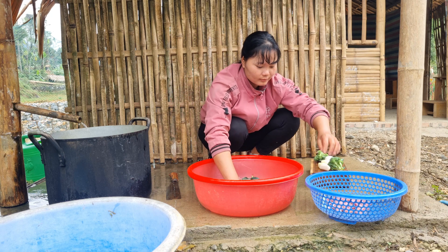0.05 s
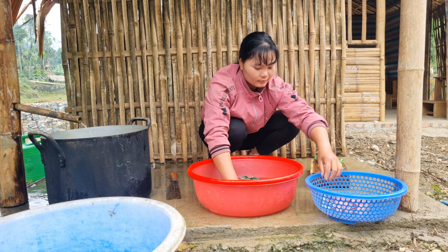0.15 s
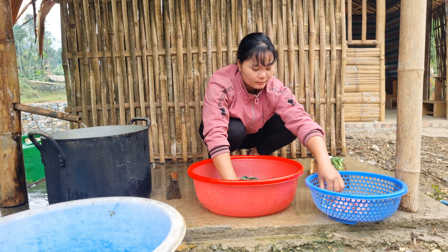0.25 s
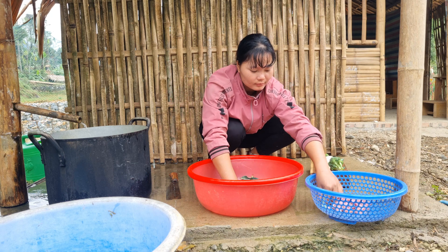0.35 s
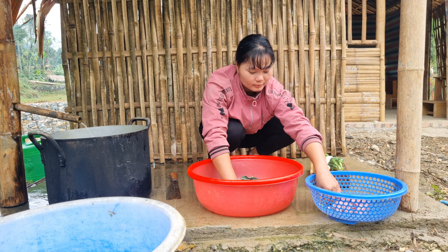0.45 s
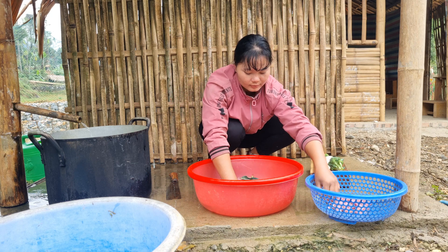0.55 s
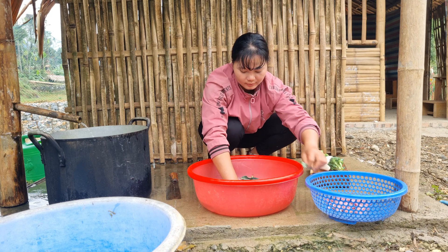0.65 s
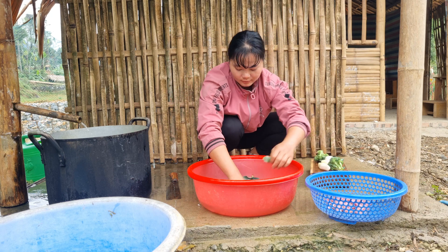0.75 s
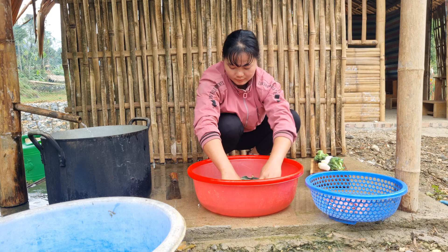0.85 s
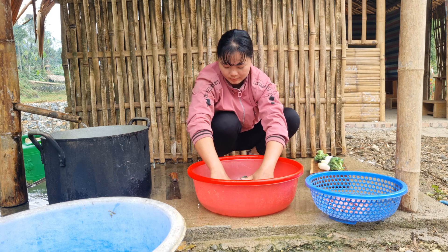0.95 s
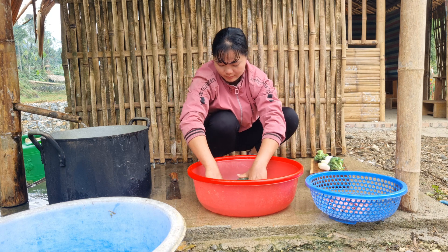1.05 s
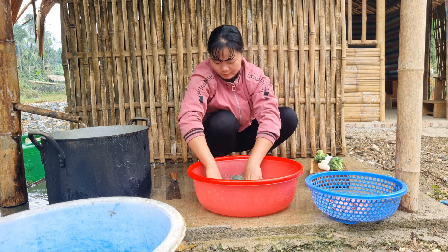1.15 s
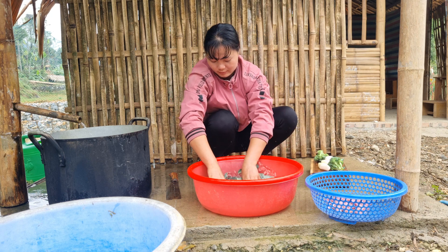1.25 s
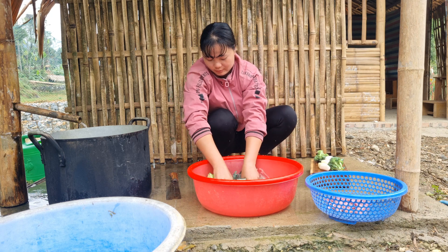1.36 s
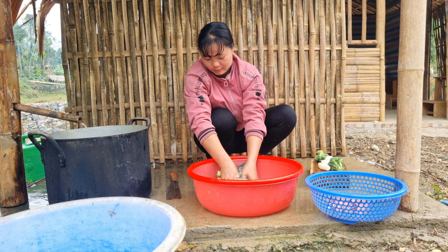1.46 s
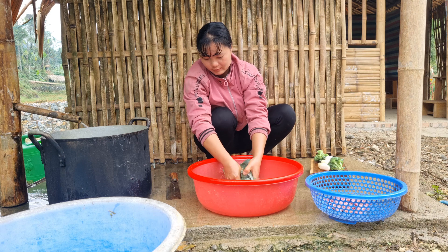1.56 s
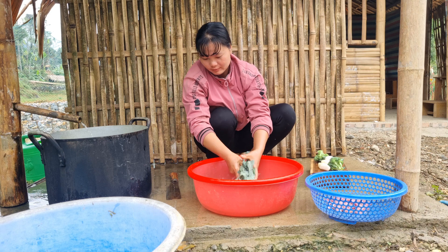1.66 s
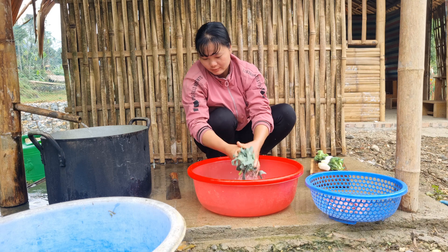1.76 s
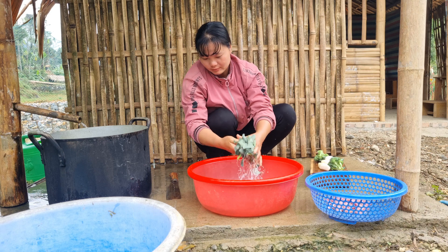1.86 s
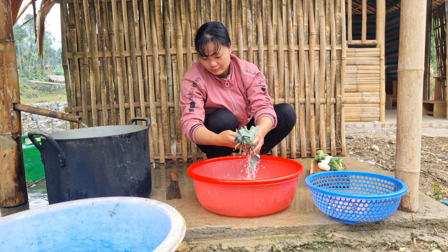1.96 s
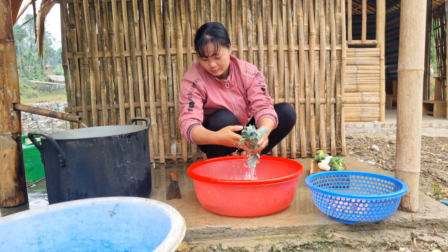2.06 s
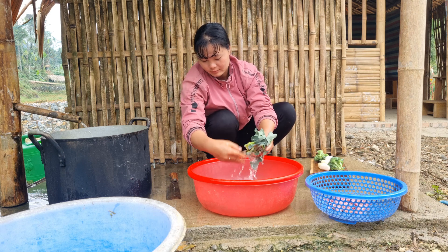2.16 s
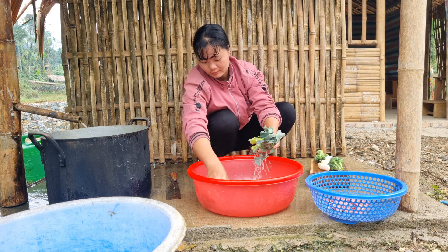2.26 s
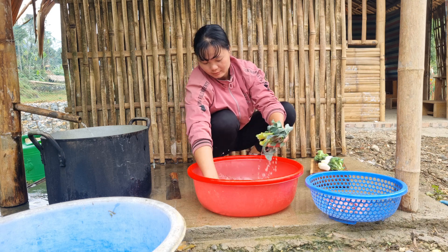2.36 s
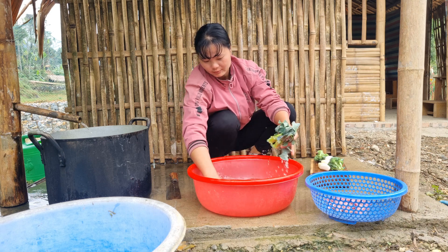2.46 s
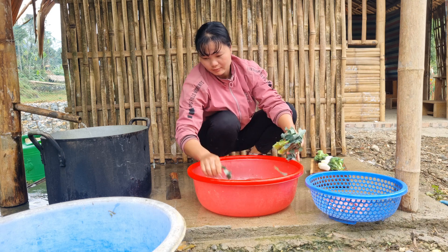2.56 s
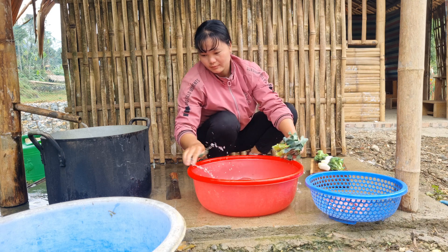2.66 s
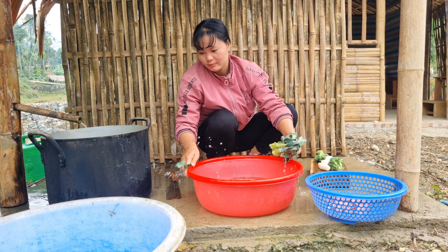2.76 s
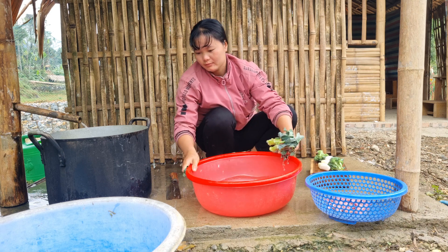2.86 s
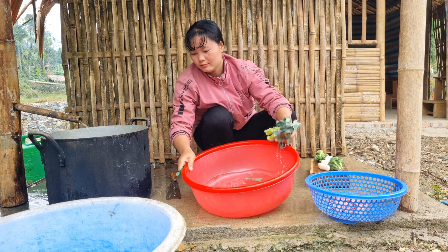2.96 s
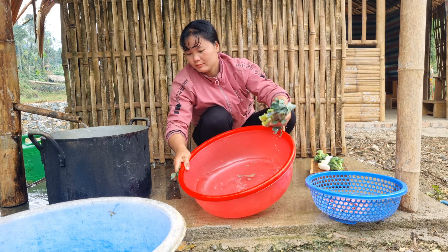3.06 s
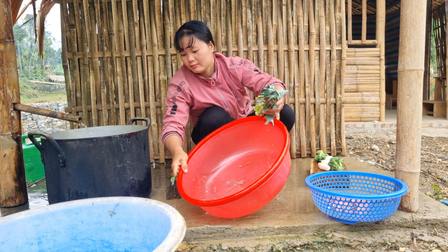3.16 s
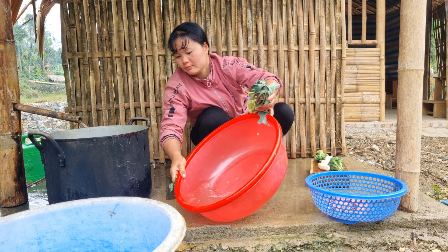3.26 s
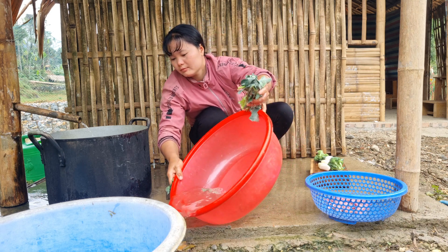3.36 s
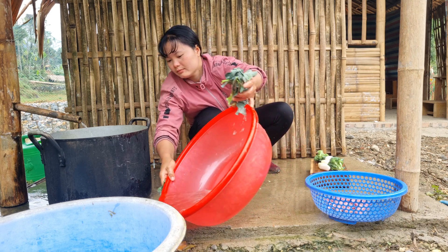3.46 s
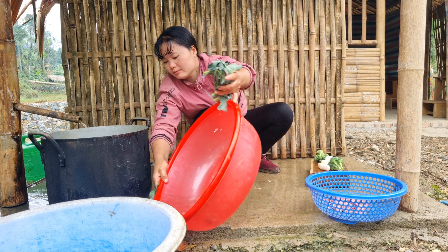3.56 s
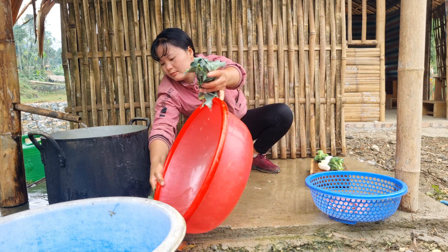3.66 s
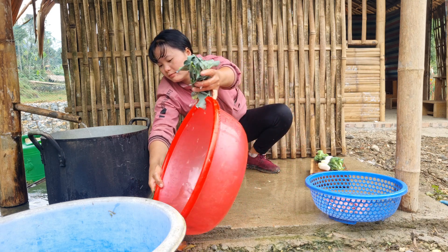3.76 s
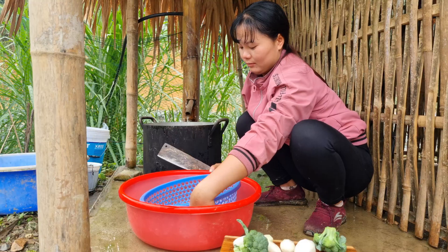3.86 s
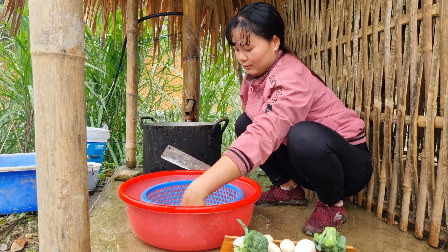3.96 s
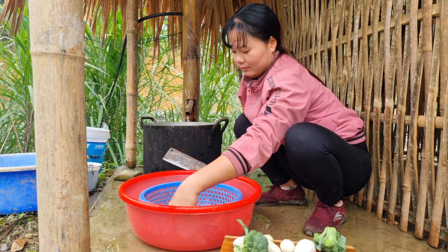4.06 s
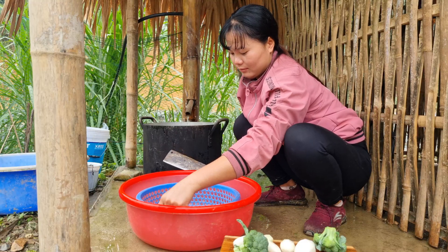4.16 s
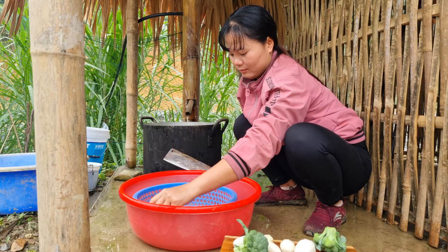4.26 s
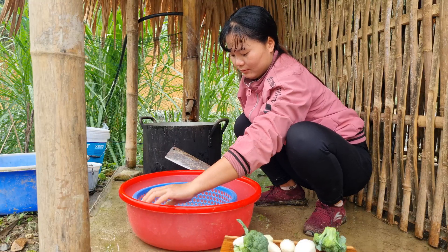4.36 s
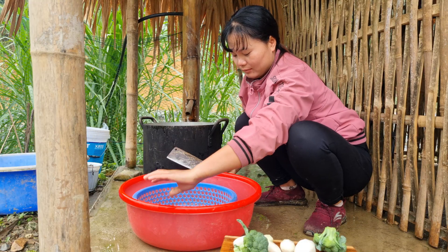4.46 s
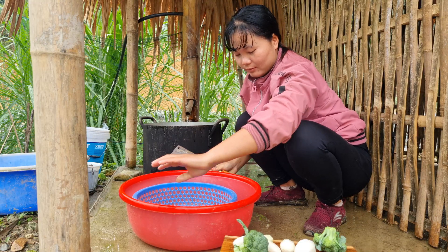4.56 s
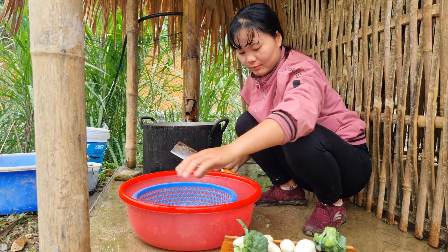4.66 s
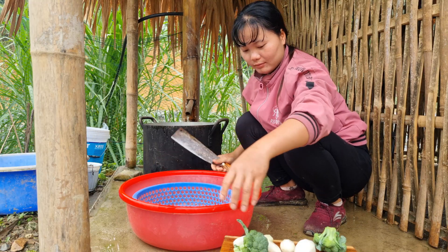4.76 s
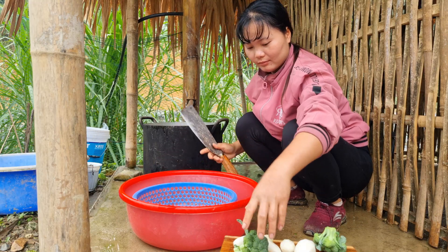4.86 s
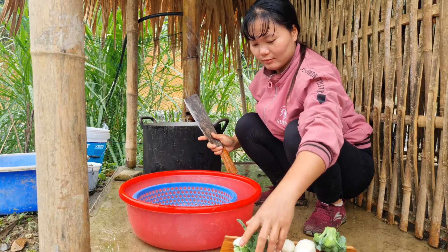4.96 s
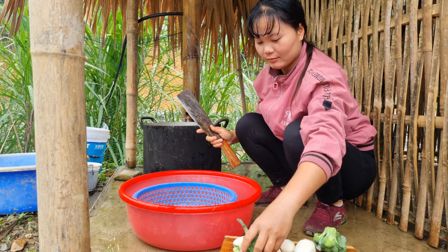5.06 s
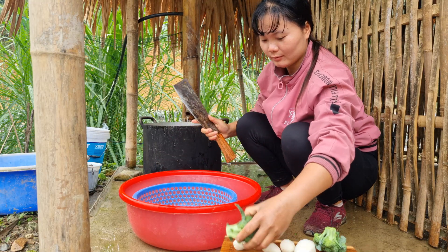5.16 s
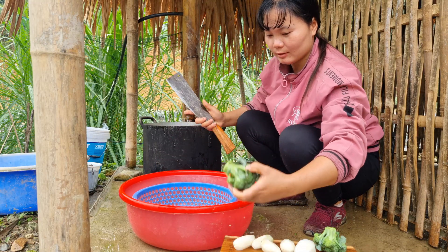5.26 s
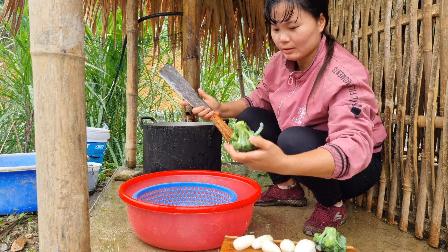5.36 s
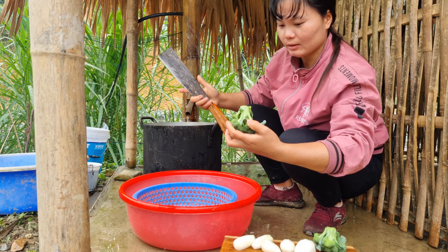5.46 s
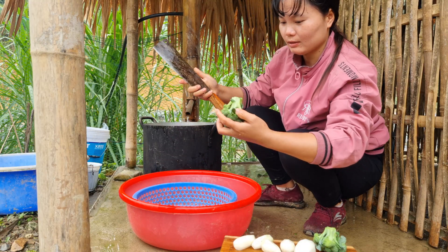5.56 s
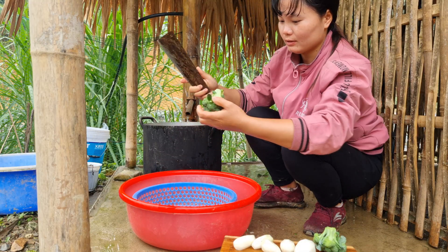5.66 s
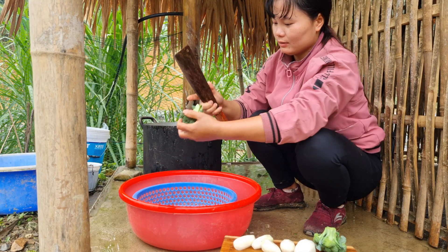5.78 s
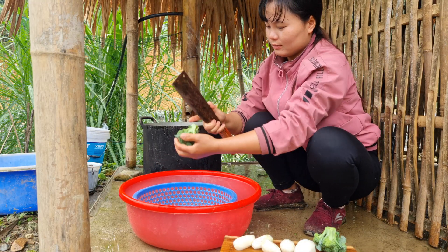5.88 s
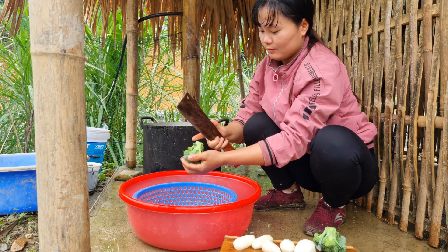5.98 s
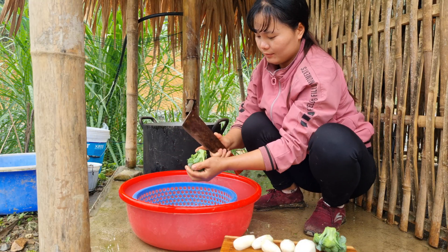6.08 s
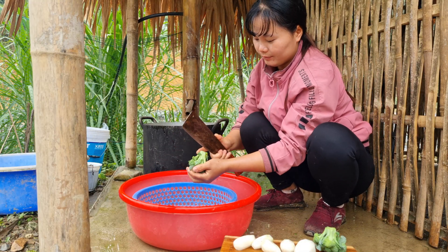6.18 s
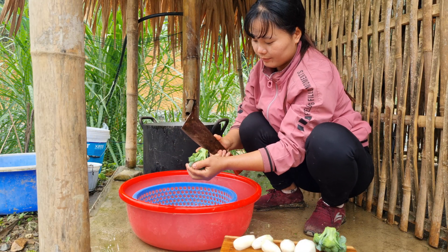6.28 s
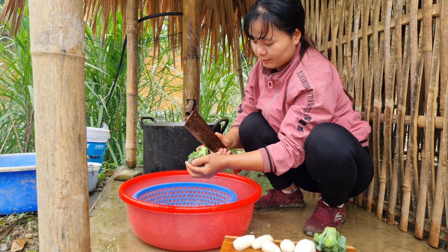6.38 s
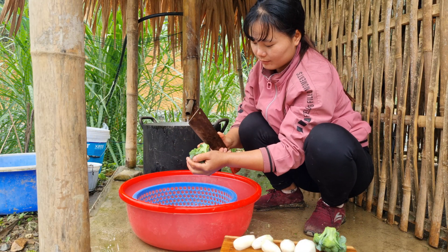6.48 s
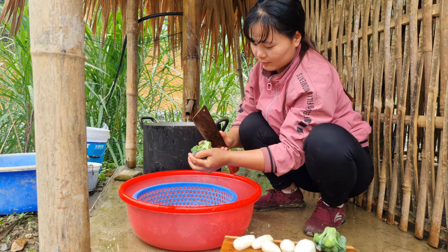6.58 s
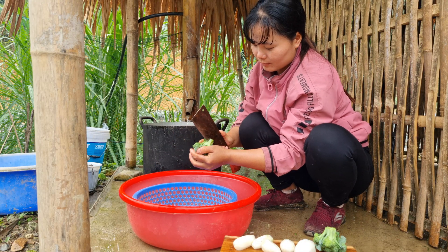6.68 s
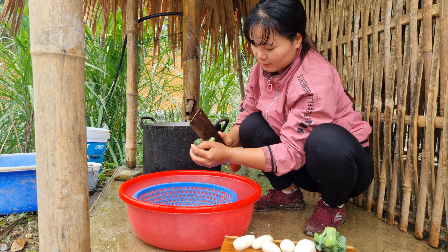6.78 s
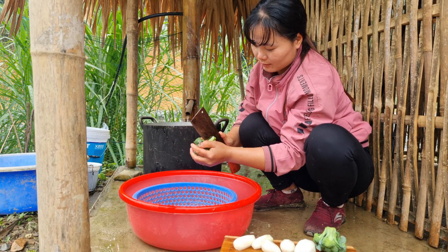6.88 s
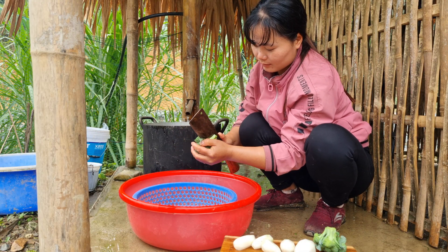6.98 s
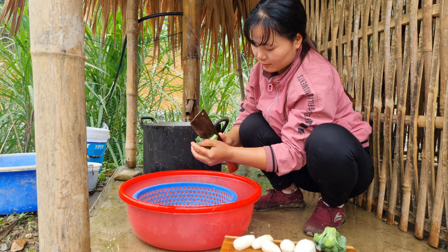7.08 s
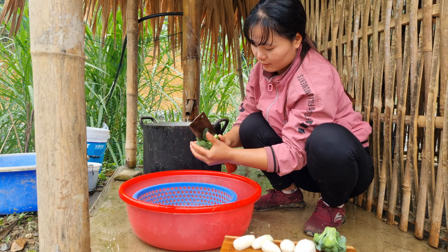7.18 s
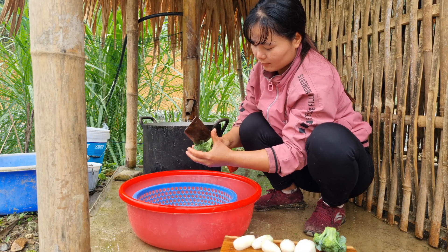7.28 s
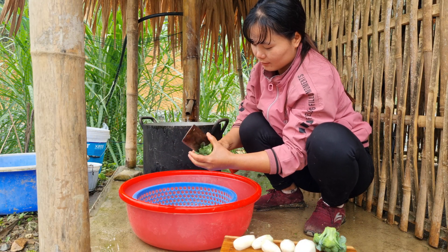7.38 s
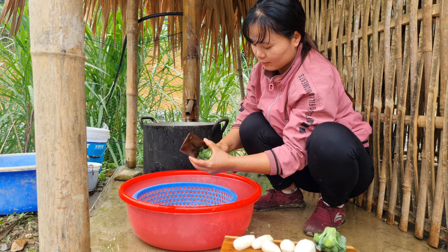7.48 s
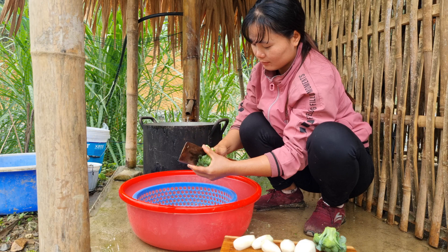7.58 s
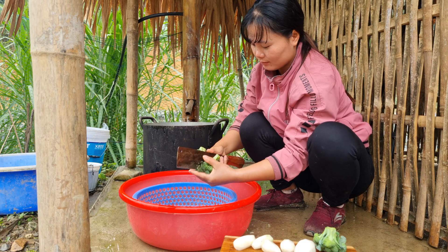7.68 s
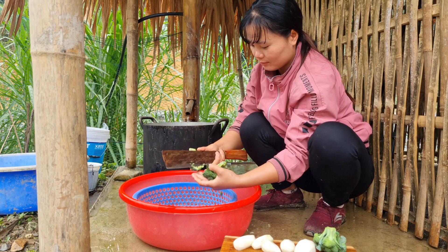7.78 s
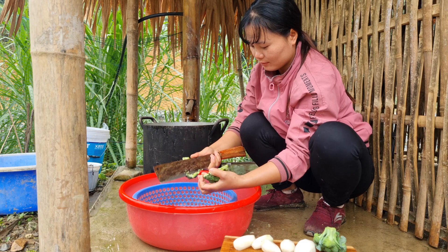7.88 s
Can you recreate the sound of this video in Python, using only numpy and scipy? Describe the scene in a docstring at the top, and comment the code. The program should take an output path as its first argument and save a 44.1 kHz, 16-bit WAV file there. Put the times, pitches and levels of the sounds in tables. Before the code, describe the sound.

Outdoors in a farmyard, close stereo microphone. Hands stir vegetables in a plastic basin with soft bubbles, drips and splashes that grow as greens are lifted. Chicks peep thinly. The basin is tipped: a rushing pour and a very loud hollow knock. Then the water stops; dry leaf and blade strokes, small snaps and a sharp plastic knock sound over a low distant engine hum and thin trickle.

```python
"""Hands wash vegetables in a plastic basin in a farmyard: coloured noise and crowds of bubbles slosh and pour.
Single bubbles, drips and ticks ring short bursts; blows on the basin ring its damped modes.
After the water, noise strokes of leaves and a blade rustle over a basket while distant engine orders hum.
A thin trickle rings a hollow pipe throughout, chicks peep gliding tones and a hen murmurs noisily."""
import sys
import numpy as np
from scipy import signal
from scipy.fft import rfft, irfft, next_fast_len
from scipy.io import wavfile
from scipy.ndimage import uniform_filter1d, map_coordinates

SR = 44100
rng = np.random.default_rng(int(sys.argv[2]) if len(sys.argv) > 2 else 0)


def convert_level_to_amplitude(level_db):
    """Map a level in decibels to its linear amplitude factor."""
    exponent = np.asarray(level_db, float) / 20
    return 10 ** exponent


def unload_audio(sound):
    """Save the sound as a 16-bit wav file, at the path given as the first command line argument."""
    columns = np.transpose(np.atleast_2d(sound))
    # keep every value between -1 and 1, then stretch to whole-number steps
    steps = np.round(np.clip(columns, -1, 1) * 32767)
    wavfile.write(sys.argv[1], SR, steps.astype(np.int16))


N = 349713
TIME = np.arange(N) / SR
RUSTLE_S = 4.3  # water stops, trimming starts

# distant engine: [t/s, cycle rate/Hz, level/dB]
ENGINE_COURSE = [(4.05, 31.97, -48), (4.64, 32.47, -47), (4.82, 32.33, -47), (5.01, 32.8, -46.5),
                 (5.31, 32.46, -48), (6.1, 32.38, -47), (6.59, 32.96, -48.5), (7.29, 32.56, -47.5),
                 (7.93, 33.1, -49.5)]


def unit(x):
    """Scale to rms 1."""
    return x / np.sqrt(np.mean(x ** 2) + 1e-20)


def along(points, hz):
    """Interpolate (Hz, value) points on a log frequency axis."""
    f, v = np.transpose(points)
    return np.interp(np.log(hz + 1), np.log(f + 1), v)


def curves(rows):
    """One value per sample for each column after the time."""
    s, *cols = np.transpose(rows)
    return [np.interp(TIME, s, c) for c in cols]


def wobble(rate_hz):
    """Smooth random curve with rate_hz knots per second."""
    knots = rng.standard_normal(int(N * rate_hz / SR) + 4)
    return map_coordinates(knots, [TIME * rate_hz])


def filtered(x, response):
    """Multiply the spectrum of x by a complex response of frequency."""
    m = next_fast_len(N + SR // 2)
    return irfft(rfft(x, m) * response(np.fft.rfftfreq(m, 1 / SR)), m)[..., :N]


def resonance(f, hz, width_hz):
    """Causal second-order band-pass, peak gain 1."""
    return 1j * f * width_hz / (hz * hz - f * f + 1j * f * width_hz)


def panned(x, db):
    """Mono to stereo, left louder than right by db."""
    return np.array([x * convert_level_to_amplitude(db / 2), x * convert_level_to_amplitude(-db / 2)])


def rush(spectrum, source):
    """Colour two noises and mix them to a frequency-dependent left-right likeness, rms 1."""
    # [f/Hz, likeness]
    likeness = [(60, 0.95), (300, 0.41), (1000, 0.046), (3000, 0.087), (15000, 0.015)]

    def response(hz):
        angle = np.arccos(np.clip(along(likeness, hz), -1, 1)) / 2
        return convert_level_to_amplitude(along(spectrum, hz)) * [np.cos(angle), np.sin(angle)]

    mid, side = filtered(source, response)
    return unit(np.array([mid + side, mid - side]))


def patchy(depth_db):
    """Two noises whose level varies alike in small patches of time and frequency."""
    z = signal.stft(rng.standard_normal((2, N)), nperseg=256)[2]
    field = uniform_filter1d(rng.standard_normal(z.shape[1:]), size=7, axis=0)
    field = uniform_filter1d(field, size=5, axis=1)
    return signal.istft(z * convert_level_to_amplitude(depth_db * unit(field)), nperseg=256)[1][:, :N]


def add(track, s, sound):
    """Mix a short sound in at s seconds."""
    spot = track[..., round(s * SR):][..., :sound.shape[-1]]
    spot += sound[..., :spot.shape[-1]]


def swells(times, hold, db, rise, fade):
    """Amplitude of power-summed humps: 20 dB up in |rise| s, hold, 20 dB down in |fade| s."""
    grid = TIME[::32]
    power = 0
    for s, stay, level, up, down in np.broadcast(times, hold, db, rise, fade):
        before = (s - grid) / abs(up)
        after = (grid - s - stay) / abs(down)
        below = np.maximum(np.maximum(before, after), 0)
        power = power + convert_level_to_amplitude(2 * (level - 20 * below))
    return np.interp(TIME, grid, np.sqrt(power))


def arch(s, length, hz, db, edge_db, glide_hz=0, sag=0):
    """Call on a bowed, gliding pitch; its ends are edge_db softer than its middle."""
    u = np.linspace(-1, 1, 9)
    pitch = hz * (1 - sag * u ** 2) + glide_hz * u / 2
    return np.transpose([s + length * (u + 1) / 2, pitch, db - edge_db * u ** 2])


def gated(call):
    """Phase and amplitude of one call, with 2.8 ms edges."""
    hz, db = curves(call)
    gate = np.clip(np.minimum(TIME - call[0][0], call[-1][0] - TIME) / 0.0028, 0, 1)
    return 2 * np.pi * np.cumsum(hz) / SR, convert_level_to_amplitude(db) * gate


def yard(x):
    """Walls and ground answer: a noise tail in which each frequency dies at its own speed."""
    # [f/Hz, t60/s]
    decay = [(200, 0.18), (2000, 0.15), (10000, 0.17)]
    hz, t, z = signal.stft(rng.standard_normal((2, SR // 2)), SR, nperseg=256)
    tail = signal.istft(z * convert_level_to_amplitude(-60 * t / along(decay, hz)[:, None]), SR, nperseg=256)[1]
    tail = tail / np.linalg.norm(tail[0])
    return signal.fftconvolve(np.pad(x, (200, 0))[None], tail, axes=1)[:, :N]


def air():
    """Air of the yard: steady coloured noise, patchy and slightly unsteady."""
    # [f/Hz, relative density/dB]
    spectrum = [(88, -8), (150, -28), (406, -4.5), (649, 4), (821, -3.5), (1240, 4), (1530, -1), (1940, -4),
                (3350, -5.5), (7620, -2.5), (8900, -17), (14800, -8), (16000, -17)]
    return convert_level_to_amplitude(-63 + 1.6 * wobble(8.4)) * rush(spectrum, patchy(4.5))


def rumble():
    """Low far-off noise throbbing near 36 Hz, and the boom of the lifted basin; ends as the engine enters."""
    # [t/s, level/dB]
    course = [(0, -64.5), (.84, -71), (1.15, -69), (1.2, -60.5), (1.75, -59), (2.08, -69), (2.45, -57),
              (2.55, -67), (2.8, -60), (2.83, -58), (3.014, -47), (3.13, -61), (3.17, -69), (3.3, -74),
              (3.33, -55.5), (3.878, -48), (4.05, -49)]
    # [f/Hz, relative density/dB]
    spectrum = [(12, -50), (20, -19), (102, 3.5), (124, -5.5), (140, -44), (166, -8.5), (242, -15),
                (300, -18), (390, -27), (660, -120)]
    db, = curves(course)
    throb_db = 2.4 * np.sin(2 * np.pi * 36.0 * TIME + 2.0 * wobble(6.0))
    noise = rush(spectrum, rng.standard_normal((2, N)))
    return (TIME < ENGINE_COURSE[0][0]) * convert_level_to_amplitude(db + throb_db) * noise


def engine():
    """Low orders of a steady motor, each slightly unsteady, over resonant low noise."""
    # [multiple of cycle rate, relative level/dB]
    orders = [(1, -10), (2, 5.5), (3, -3.5), (4, 3.5), (5, -1), (6, -21.5), (8, -26.5)]
    hz, db = curves(ENGINE_COURSE)
    phase = 2 * np.pi * np.cumsum(hz) / SR
    tones = 0
    for k, level_db in orders:
        gain = convert_level_to_amplitude(level_db + 0.69 * wobble(2.52))
        tones = tones + gain * np.sin(k * phase + 0.61 * wobble(12.0) + 0.4 * k)
    noise = filtered(rng.standard_normal(N), lambda f: resonance(f, 99, 106) ** 2)
    return (TIME > ENGINE_COURSE[0][0]) * convert_level_to_amplitude(db) * (unit(tones) + 0.29 * unit(noise))


def whine():
    """Thin far tone with a wavering phase."""
    # [t/s, f/Hz, level/dB]
    course = [(7.5, 1497, -58), (7.6, 1506, -71), (7.93, 1506, -69)]
    phase, level = gated(course)
    return level * np.sin(phase + 1.1 * wobble(40))


def trickle():
    """Irregular drops excite the air column of the pipe in short broken rings."""
    # [t/s, level/dB]
    course = [(0, -72.5), (2.5, -64), (3.1, -70), (4.3, -74.5), (5.3, -69), (6.1, -66.5), (6.4, -60.5),
              (6.5, -67), (6.7, -65), (7.93, -67.5)]
    # air resonances: [f/Hz, width/Hz, level/dB]
    pipe = [(671, 66, -3.3), (1160, 57, -3.6), (1920, 47, -2)]
    drips_per_s = 110
    db, = curves(course)
    hit = rng.random(N) < drips_per_s / SR
    rings = 0
    for hz, width_hz, level_db in pipe:
        push = (hit * convert_level_to_amplitude(3 * wobble(30)) + .018) * rng.standard_normal(N)
        ring = filtered(push, lambda f: resonance(f, hz, width_hz) * resonance(f, hz, 3.1 * width_hz))
        rings = rings + convert_level_to_amplitude(level_db) * unit(ring)
    return convert_level_to_amplitude(db) * rings


def birds():
    """Chicks whistle breathy glides; the hen's noisy voice rings a throat resonance and a weaker one below."""
    # chicks: [t/s, length/s, middle f/Hz, glide/Hz, share by which the ends sag, level/dB]
    peeps = [(2.256, 0.1, 7300, 500.5, .04, -53), (2.466, .09, 6900, -150, 0.027, -47.5),
             (2.608, 0.1, 6430, 1502, .085, -51.5), (2.819, 0.047, 7000, -100, 0.016, -48),
             (2.86, 0.08, 6500, -500, 0.0045, -56), (3.048, 0.1, 4600, -1150, .005, -53),
             (3.203, 0.051, 4950, -200, 0.0046, -51), (4.848, 0.08, 3960, -200, .02, -53),
             (6.249, 0.067, 4200, -300, .02, -56), (7.246, 0.024, 4370, -300, .02, -44)]
    # hen: [t/s, length/s, throat f/Hz, level/dB]
    murmurs = [(5.738, 0.027, 1660, -48), (6.673, 0.099, 1752, -52.5), (6.752, 0.0817, 1763, -55),
               (6.932, 0.15, 1778, -59.5)]
    peep_edge_db, murmur_edge_db = 12, 5
    out = np.zeros(N)
    for s, length, hz, glide_hz, sag, db in peeps:
        phase, level = gated(arch(s, length, hz, db, peep_edge_db, glide_hz, sag))
        out += level * convert_level_to_amplitude(3.5 * wobble(70)) * np.sin(phase + .9 * wobble(350))
    for call in murmurs:
        phase, level = gated(arch(*call, murmur_edge_db, glide_hz=-39, sag=0.027))
        rasp = wobble(190) * np.sin(phase) + wobble(190) * np.cos(phase)
        rasp += 0.35 * wobble(3800) + .25 * wobble(150) * np.sin(.82 * phase)
        out += level * convert_level_to_amplitude(3.5 * wobble(50)) * rasp
    return out


def swishes():
    """Wet hand or sleeve: noise in a broad gliding band."""
    # [t/s, length/s, middle f/Hz, glide/Hz, level/dB]
    moves = [(4.546, 0.15, 4120, -1200, -54), (5.07, 0.11, 4160, -700, -53.5),
             (5.728, 0.2, 3240, 2799.5, -50.5)]
    edge_db = 7
    out = np.zeros((2, N))
    for s, length, hz, glide_hz, db in moves:
        phase, level = gated(arch(s, length, hz, db, edge_db, glide_hz))
        noise = np.array([wobble(1800) * np.sin(phase), wobble(2000) * np.cos(phase)])
        out += level * convert_level_to_amplitude(1.3 * wobble(60)) * noise
    return out


def rustle():
    """Dry friction of leaves, sleeve and blade: scratchy grains under each stroke also ring the blade."""
    # [start of full strength/s, hold/s, level/dB, swell/(s per 20 dB), fade/(s per 20 dB)], sign of slopes unused
    strokes = [(4.336, 0.016, -49, 1, -0.07), (4.637, 0.031, -48, 0.1, -0.02),
               (4.82, 0.026, -56.5, 1.2, -0.3), (5.11, 0.03, -56, -9, 0.8),
               (5.45, 0.0068, -50, -0.23, 0.37), (5.79, 0.079, -47.5, 0.2, 0.12),
               (5.977, 0.024, -54, 0, 0.55), (6.168, 0.0085, -49, -0.18, 0.3),
               (6.764, 0.033, -49.5, 0.26, 0.06), (6.961, 0.082, -48.5, 0.06, 0.03),
               (7.195, 0.0081, -45.5, -0.04, 0.11), (7.426, 0.041, -43.5, 0.08, 0.03),
               (7.521, 0.0097, -45, 0.03, 0.07), (7.708, 0.012, -54.5, 0.2, 0.3)]
    # [f/Hz, relative density/dB]
    leaf_spectrum = [(180, -66), (300, -6.5), (1040, -11.5), (1900, -7), (2170, -8), (3350, -5.5),
                     (7820, -7), (8940, -12.5), (15000, -11.5), (16000, -35)]
    # [f/Hz, width/Hz, level/dB]
    blade = [(3300, 500, -14.5), (5500, 570, -12), (7800, 310, -9)]
    grains_per_s = 130
    stroke = swells(*np.transpose(strokes))
    grains = 22 * (rng.random(N) < grains_per_s / SR) * rng.standard_normal((2, N))
    grit = patchy(2.6) * convert_level_to_amplitude(1.6 * wobble(400) + 1.5 * wobble(70)) + grains
    rings = 0
    for hz, width_hz, db in blade:
        ring = unit(filtered(grit, lambda f: resonance(f, hz, width_hz) ** 2))
        rings = rings + convert_level_to_amplitude(db + 3.65 * wobble(35)) * ring
    fidget = convert_level_to_amplitude(-64 + 3 * wobble(7))  # hands never quite still between strokes
    return (TIME >= RUSTLE_S) * (np.hypot(fidget, stroke) * rush(leaf_spectrum, grit) + stroke * rings)


def knocks():
    """Each blow rings the basin's modes by sharpness and place of contact, with a scrape of noise."""
    # [t/s, level/dB, relative thud/dB, relative clack/dB, strongest mode f/Hz]
    blows = [(2.416, -45, -2.5, -2, 85), (2.841, -44.5, 7, 15, 620), (2.885, -48, 7, 2, 624),
             (2.935, -42.5, 0, 8.5, 690), (2.945, -41.5, -4, -3, 79.5), (2.959, -49, 14.5, -9, 77),
             (2.999, -44, 8, 2, 62.5), (3.054, -46.5, 5, -3, 72), (3.322, -41.5, -1, 4.5, 245),
             (3.356, -51, 5.5, -3, 247), (3.474, -41.5, -9.5, 13, 616), (3.6591, -6, -41, -9, 911),
             (3.741, -37, -7, 11, 407), (3.834, -16, -7.5, -3, 277), (3.864, -30.5, -10, -7, 636),
             (3.898, -31.5, 3, 1, 433), (3.998, -34, 0, 15.5, 396), (4.01, -36.5, 4, 11.5, 63),
             (4.061, -37.5, -1.5, 13, 384), (4.327, -50, 3.5, 21, 1454), (4.336, -52, 8, 19.5, 2050),
             (4.343, -52, 13, 22, 1330), (6.182, -20, -5, -10, 618), (6.198, -35, 0, -3.5, 259),
             (6.234, -38, -2, -0.5, 73), (7.437, -45, 11, -12.5, 300), (7.484, -48.5, 8, -26, 280)]
    # [f/Hz, level/dB, relative ring time]
    modes = [(50, -2, 2.9), (72, 0, 2.4), (110, 1.5, 2.04), (151, 6, 1.68), (259, 5.5, 0.81),
             (401, 3.5, 0.93), (633, 5, 0.49), (950, -1, 0.65), (1150, 1.5, 0.82), (1600, -5, 1.04),
             (2062, -10.5, 0.8), (2730, -10.5, 0.57)]
    base_t60_s, swell_cycles = 0.033, 0.69  # soft plastic: modes build up over a cycle or two
    out, t = np.zeros(N), np.arange(SR // 3) / SR
    hz, level_db, life = np.transpose(modes)[:, :, None]
    sign = (-1) ** np.arange(len(modes))[:, None]
    for s, db, thud_db, clack_db, main_hz in blows:
        draw = rng.standard_normal((2, len(modes), 1))
        # the spot struck drives one mode hardest; grip and load shift its pitch
        near = np.exp(-(np.log(hz / main_hz) / 0.2) ** 2)
        pitch = hz * (main_hz / hz) ** near * (1 + 0.038 * draw[1] * (1 - near))
        contact_db = along([(200, thud_db), (500, 0), (1100, clack_db)], hz)
        gain_db = level_db + contact_db + 9 * near + 2.06 * draw[0] * (1 - near)
        t60_s = base_t60_s * life * (1 + 0.5 * near)
        ring = convert_level_to_amplitude(gain_db - 60 * t / t60_s) * np.sin(2 * np.pi * pitch * t)
        ring = ring * sign * (1 - np.exp(-t * pitch / swell_cycles)) ** 2
        noise = uniform_filter1d(rng.standard_normal(len(t)), size=7)
        noise = unit(uniform_filter1d(noise, size=4)) / 2
        scrape = 1.17 * convert_level_to_amplitude(clack_db - 60 * t / 0.054) * noise
        add(out, s, convert_level_to_amplitude(db) * (ring.sum(0) + scrape) * (1 - np.exp(-t / 0.0014)))
    return out


def ticks():
    """Drops on plastic, snapping stalks: short bright noise bursts, each with its own bright spot."""
    # [t/s, peak/dB, bright spot f/Hz, t60/s]
    snaps = [(0.0702, -27, 2420, 0.021), (0.1897, -38, 8000, 0.078), (0.4724, -40, 6950, 0.046),
             (0.559, -42.5, 2340, 0.09), (0.602, -42, 5470, 0.047), (.9693, -37, 5460, 0.039),
             (1.2007, -42.5, 4030, .04), (1.3096, -40.5, 2640, 0.11), (1.549, -33, 5500, 0.048),
             (1.5793, -30.5, 6150, 0.072), (0.377, -45, 5000, .05), (2.648, -40, 4440, 0.034),
             (1.8724, -29, 5530, 0.062), (2.097, -23, 5070, 0.049), (2.14, -28.5, 7800, 0.034),
             (2.2274, -33, 3570, 0.033), (2.347, -29, 3300, 0.045), (2.783, -30.5, 5100, 0.069),
             (2.809, -37, 5610, 0.07), (2.931, -35.5, 7600, 0.14), (3.027, -35, 4360, 0.046),
             (3.158, -38.5, 4560, 0.044), (3.31, -41, 4670, 0.11), (3.442, -27.5, 6300, 0.022),
             (3.452, -22, 3750, 0.069), (3.6464, -14.5, 6360, 0.014), (3.94, -26.5, 2980, 0.08),
             (3.9983, -24.5, 2600, 0.026), (4.327, -28, 2630, 0.065), (5.448, -37, 2730, 0.066),
             (5.756, -45, 8500, 0.034), (6.475, -45.5, 9400, 0.041), (6.756, -40, 5500, .04),
             (6.1633, -32, 5360, 0.065), (6.965, -35.5, 7140, 0.044), (7.1788, -38, 4480, .04),
             (7.415, -40, 7840, 0.053), (7.5198, -26, 4970, 0.017), (7.6934, -43, 7800, 0.037),
             (7.8685, -34.5, 7000, 0.064)]
    out, t = np.zeros((2, N)), np.arange(SR // 10) / SR
    f = np.fft.rfftfreq(len(t), 1 / SR)
    for s, db, hz, t60 in snaps:
        noise = 0.8 * rng.standard_normal(len(t)) + rng.standard_normal((2, len(t)))
        tone = 0.5 * resonance(f, 6500, 14000) + 4 * resonance(f, hz, 30 / t60)
        snap = irfft(rfft(convert_level_to_amplitude(-60 * t / t60) * noise) * tone)
        add(out, s, convert_level_to_amplitude(db) * snap / np.abs(snap.mean(0)).max())
    return out


def bubble(t, hz, t60, rise, swell):
    """An air pocket swells, rings and climbs in pitch as it nears the surface."""
    ring = np.sin(2 * np.pi * hz * t * (1 + rise * t / t60))
    return ring * convert_level_to_amplitude(-60 * t / t60) * (1 - np.exp(-t / swell))


def bubbles():
    """Larger bubbles and drips: a roughened ring inside a short splash of noise around the same pitch."""
    # [t/s, level/dB, f/Hz]
    drops = [(.049, -42, 620), (.22, -43, 980), (0.271, -42.5, 1102), (.345, -45, 500), (.375, -46, 610),
             (.446, -37, 1070), (.557, -41.5, 1095), (.679, -44.5, 670), (.696, -33, 1092),
             (0.758, -40.5, 1140), (0.833, -40.5, 964), (.953, -36, 925), (0.984, -36, 1070),
             (1.03, -31, 620), (1.054, -32.5, 1460), (1.189, -40, 1075), (1.29, -36, 1280),
             (1.305, -33, 1410), (1.309, -43, 476), (1.345, -38, 556), (1.46, -46, 407),
             (1.492, -39.5, 450), (1.545, -39, 420), (1.362, -35, 1750), (1.478, -33, 1765),
             (1.544, -34, 1017), (1.601, -22, 1785), (1.605, -36, 443), (1.617, -27, 1850),
             (1.739, -31, 1585), (1.755, -29.5, 1920), (1.612, -39, 680), (1.365, -33, 1450),
             (1.745, -40, 444), (1.7525, -34, 3340), (1.909, -36, 1490), (1.986, -28, 3170),
             (2.043, -28.5, 1770), (2.0783, -31, 3750), (2.098, -23.5, 1394), (2.136, -29, 1435),
             (2.18, -35, 1380), (2.2279, -48, 3560), (2.279, -30.5, 636), (2.318, -32, 427),
             (2.408, -30, 1840), (2.468, -28.5, 2040), (2.49, -38.5, 685), (2.528, -34.5, 2150),
             (2.544, -32, 1150), (2.555, -24.5, 1794), (2.674, -35.5, 2050), (2.697, -37, 3300),
             (2.72, -36.5, 602), (2.749, -38, 1120), (2.842, -38, 535), (3.025, -45, 3870),
             (3.382, -34, 2870), (3.454, -27, 1125), (3.499, -25, 1530), (3.51, -23, 2600),
             (3.714, -20, 1930), (3.795, -27, 2660), (4.109, -33.5, 1926), (4.135, -42, 1000),
             (4.155, -40, 1160), (4.185, -41, 1110), (4.19, -38, 1505), (4.245, -43, 1105),
             (4.187, -40, 685), (4.542, -39, 573), (4.644, -43, 510), (4.65, -42, 1095), (4.89, -49, 955),
             (4.995, -50, 950), (4.837, -45, 1180), (4.86, -38, 1195), (4.88, -40.5, 704),
             (4.945, -46.5, 715), (5.0, -49, 490), (5.43, -40.5, 1920), (5.54, -44.5, 786),
             (5.793, -37, 660), (6.121, -37.5, 1894), (6.291, -36, 1103), (6.335, -36, 1873),
             (6.384, -34, 1870), (6.961, -36, 1908), (7.097, -36, 493), (7.185, -38, 1843),
             (7.403, -41, 1160), (7.533, -35, 1864), (7.578, -41, 1910), (7.674, -34, 675)]
    out, t = np.zeros(N), np.arange(SR // 10) / SR
    f = np.fft.rfftfreq(len(t), 1 / SR)
    for s, db, hz in drops:
        rough = 1 + 1.02 * uniform_filter1d(rng.standard_normal(len(t)), size=24)
        noise = rng.standard_normal(len(t)) * convert_level_to_amplitude(-60 * t / 0.15)
        splash = irfft(rfft(noise) * resonance(f, hz, 0.42 * hz))
        t60_s = .052 * min(1, np.sqrt(1100 / hz))
        ring = rough * bubble(t, hz, t60_s, rise=.1, swell=.004)
        add(out, s, convert_level_to_amplitude(db) * (ring + .5 * splash))
    return out


def fizz(per_s, hz, spread, cycles, scatter_db, size=700):
    """Random crowd of small bubbles, each dying 60 dB in a set number of cycles; rms 1."""
    n, t = int(per_s * RUSTLE_S), np.arange(size) / SR
    draw = rng.random((n, 2))
    pitch = np.clip(hz * np.exp(spread * rng.standard_normal((n, 1))), 340, 9000)
    gain = convert_level_to_amplitude(-scatter_db * np.log(draw[:, 1:] + .02))
    sound = bubble(t, pitch, cycles / pitch, rise=.04, swell=.003) * gain
    at = (draw[:, :1] * RUSTLE_S * SR).astype(int) + np.arange(len(t))
    return np.resize(unit(np.bincount(at.ravel(), sound.ravel())), N)


def stirring():
    """Patchy hiss of spray over a bubbling body, both in clumps; pouring is a smoother rush than sloshing."""
    # stream, swelling as greens are lifted and the basin is emptied: [t/s, hiss/dB, body/dB]
    flow = [(0, -58, -57), (.46, -57.5, -88), (.75, -59.5, -70), (1.0, -56, -55.5), (1.25, -58.5, -57.5),
            (1.35, -53, -49), (1.41, -55, -57), (1.48, -49.5, -48.5), (1.58, -56.5, -63),
            (1.68, -52.5, -52.5), (2.1, -47.5, -64), (2.42, -52.5, -62.5), (2.62, -56, -65),
            (2.85, -50, -53.5), (3.05, -54, -53), (3.22, -59, -78), (3.42, -51, -59), (3.46, -39.5, -37),
            (3.515, -33, -34), (3.555, -43.5, -42.5), (3.595, -35, -36.5), (3.635, -38, -38.5),
            (3.745, -35.5, -30.5), (3.79, -37.5, -36), (3.98, -44.5, -39.5), (4.04, -52.5, -49.5),
            (4.3, -54.5, -55)]
    # single sloshes on top: [peak t/s, hiss/dB, body/dB, fade/(s per 20 dB), sign unused]
    sloshes = [(0.075, -42, -50.5, -0.16), (.888, -53, -76, -1), (.958, -54, -52, 0.2),
               (1.199, -45, -52.5, 0.13), (1.306, -51.5, -48, 0.2), (1.547, -58, -43, 0.13),
               (1.606, -46.5, -35, 0.05), (1.625, -42, -40.5, -0.05), (1.92, -48, -55, 0.24),
               (1.99, -48.5, -46, 0.25), (2.1, -58, -55, 0), (2.14, -43, -56, 0.17),
               (2.195, -42.5, -47.5, 0.14), (2.317, -43.5, -35, 0.0358), (2.353, -36.5, -42.5, 0.0462),
               (2.42, -48, -47, 0.08), (2.471, -44, -48, 0), (2.75, -53, -55, 0.14),
               (2.936, -46, -47, 0.15), (3.36, -50.5, -61, 0.5), (3.672, -55, -35.5, 0.26),
               (3.824, -34, -27, 0.07), (4.003, -37, -27.5, 0.0252)]
    # [f/Hz, relative density/dB]
    hiss_spectrum = [(1180, -26), (2000, -11), (2200, -6.5), (2440, -13), (2910, -5.5), (7770, -7),
                     (9660, -16), (13900, -14), (16000, -11)]
    # [f/Hz, relative density/dB]
    body_spectrum = [(120, -43), (200, -12), (337, -21.5), (389, -16.5), (775, -5.5), (1860, 6.5),
                     (2260, -4), (4500, -11), (5850, -26), (9900, -120)]
    pour_s, rise_s_per_20db = 3.43, 0.018
    hiss_db, body_db = curves(flow)
    s, slosh_hiss_db, slosh_body_db, fade = np.transpose(sloshes)
    hiss_gain = np.hypot(convert_level_to_amplitude(hiss_db), swells(s, 0, slosh_hiss_db, rise_s_per_20db, fade))
    body_gain = np.hypot(convert_level_to_amplitude(body_db), swells(s, 0, slosh_body_db, rise_s_per_20db, fade))
    sloshing = TIME < pour_s
    bubbly = np.where(sloshing, 1, .5)

    spray = []
    for port in range(2):
        coarse = fizz(90, 3100, 0.33, 50, scatter_db=3.5, size=1100)
        fine = fizz(60, 6000, .4, 6, scatter_db=5, size=200)
        spray.append(coarse + .8 * fine)
    noise = np.where(sloshing, patchy(4.4), patchy(2.65)) * convert_level_to_amplitude(1.1 * wobble(250))
    hiss = rush(hiss_spectrum, noise) + 0.4 * bubbly * np.array(spray)

    gurgle = 0.8 * fizz(600, 1150, 0.52, 22, scatter_db=1.6)
    gurgle += 0.55 * fizz(110, 1200, .5, 45, scatter_db=2.2, size=2200)
    body = 0.6 * rush(body_spectrum, patchy(4.4)) + 0.75 * bubbly * gurgle

    mix = hiss_gain * convert_level_to_amplitude(2.1 * bubbly * wobble(30)) * hiss
    mix += body_gain * convert_level_to_amplitude(2.6 * bubbly * wobble(30)) * body
    return (TIME < RUSTLE_S) * mix


def scene():
    """All sources over the air of the yard; near and far point sources also echo."""
    near = panned(bubbles(), -0.29) + panned(knocks(), 1.6)
    far = trickle() + birds() + whine()
    echo = yard(convert_level_to_amplitude(-9.5) * near.mean(0) + convert_level_to_amplitude(-6) * far)
    background = air() + rumble() + panned(engine(), 2.85)
    handling = stirring() + rustle() + swishes() + ticks()
    return near + far + echo + background + handling


def roll_off(x):
    """The treble ends steeply here."""
    return signal.sosfilt(signal.butter(12, 16630, fs=SR, output="sos"), x)


def record(dry):
    """Left port duller than the right and, from about 4 s, slightly ahead; the top of the band is cut."""
    # delay of the left port, negative = ahead: [t/s, lag/s]
    left_lag = [(0, 0), (3.9, 0), (4.0, -.00008)]
    top_hz = 15750
    lag_s, = curves(left_lag)
    left = map_coordinates(dry[0], [np.arange(N) - lag_s * SR], order=3, mode="nearest")

    def tilt(hz):
        treble_db = along([(1500, 0), (8000, 0.94)], hz)
        return convert_level_to_amplitude(treble_db * np.array([[-1], [1]])) * (hz < top_hz)

    mix = filtered(np.array([left, dry[1]]), tilt)
    return roll_off(mix)


dry = scene()
out = record(dry)
unload_audio(out)
```